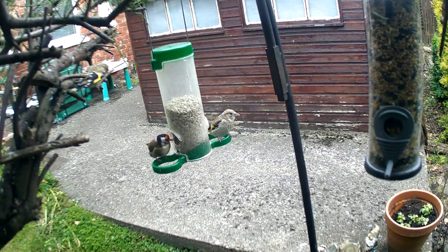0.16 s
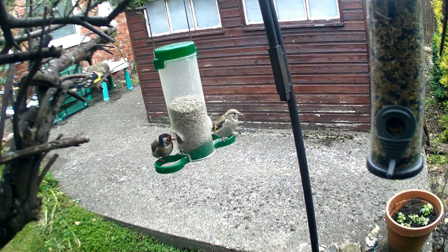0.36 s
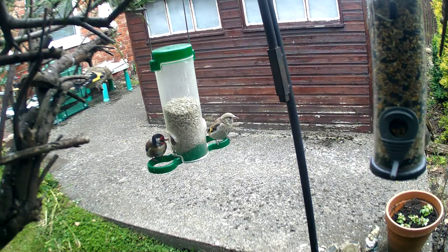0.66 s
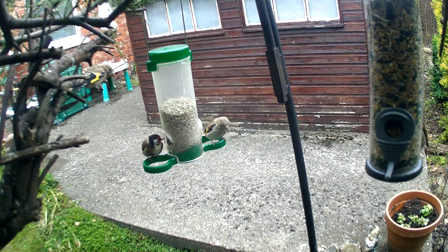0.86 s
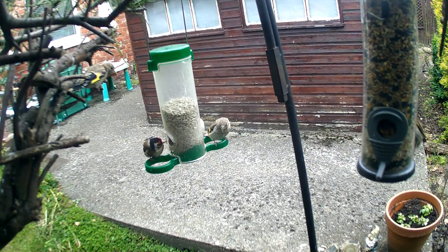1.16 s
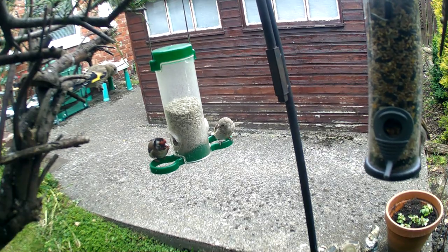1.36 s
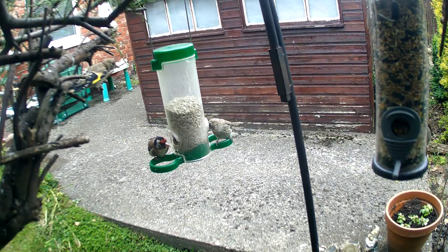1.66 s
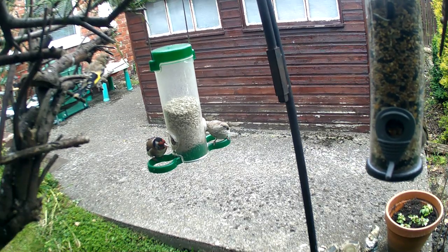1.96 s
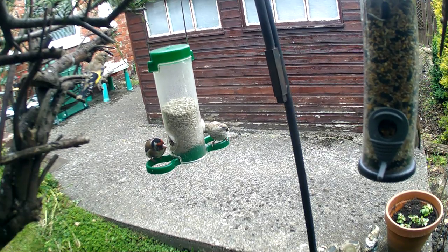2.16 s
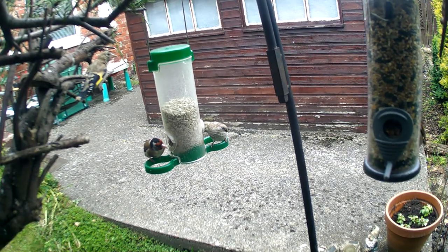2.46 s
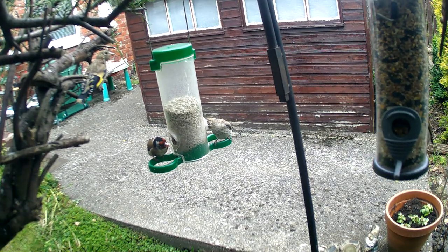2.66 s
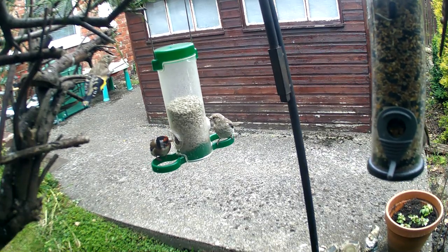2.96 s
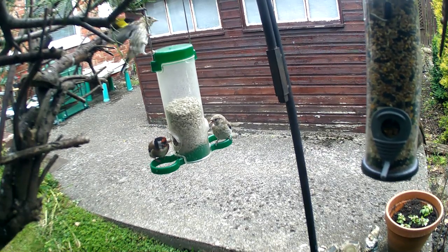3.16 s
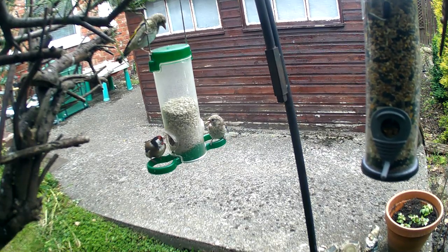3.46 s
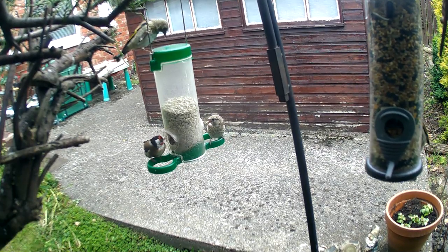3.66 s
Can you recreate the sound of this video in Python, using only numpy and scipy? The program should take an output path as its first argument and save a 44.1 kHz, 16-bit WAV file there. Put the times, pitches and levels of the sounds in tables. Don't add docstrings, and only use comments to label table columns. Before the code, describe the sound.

Garden birds whistle, chirp and twitter in overlapping bursts, with faint low rumble and hiss beneath.

```python
import sys
import numpy as np
from scipy import signal
from scipy.fft import rfft, irfft, next_fast_len
from scipy.io import wavfile
from scipy.ndimage import uniform_filter1d, map_coordinates

SR = 44100
rng = np.random.default_rng(int(sys.argv[2]) if len(sys.argv) > 2 else 0)


def convert_level_to_amplitude(level_db):
    exponent = np.asarray(level_db, float) / 20
    return 10 ** exponent


def put_to_file(sound):
    columns = np.atleast_2d(sound).T
    safe = np.clip(columns, -1, 1)
    whole_steps = np.round(safe * 32767)
    wavfile.write(sys.argv[1], SR, whole_steps.astype(np.int16))


N = 167580

# (frequency [Hz], density [dB per Hz])
RUMBLE_SPECTRUM = [(15, -67), (30, -19), (60, -13), (150, -4), (248, -5), (468, -7.5), (1100, -10.5),
                   (1430, -93)]
CHORUS_SPECTRUM = [(800, -100), (1100, -5), (3000, -2.5), (5400, -13), (7000, -28.5)]
HISS_SPECTRUM = [(3530, -62), (6500, -8.5), (8200, -5), (9800, -2.5), (11500, -5.5), (12300, -1),
                 (13000, -7), (15500, -10.5)]
# (frequency [Hz], correlation [-1..1])
STEREO_CORRELATION = [(30, 0.42), (120, 0.2), (300, -0.31), (600, 0.0028), (5000, 0.45), (14000, -0.24)]
# (time [s], level [dB])
DRONE_ENVELOPE = [(0, -67), (.8, -73), (.95, -53.5), (1.3, -67), (1.55, -56.5), (2, -68.5), (2.8, -58),
                  (3.3, -76), (3.8, -59.5)]
CHORUS_ENVELOPE = [(0.0, -56.5), (0.48, -52.5), (3.1, -51), (3.45, -57), (3.8, -52.5)]
# (delay [s], loss [dB], pan [dB])
WALL_SLAPS = [
    (0.029, -4.5, 4),
    (.058, -13, 2),
    (.085, -15.5, -6),
]

# (time [s], pitch [Hz], level [dB])
FIRST_GULL = [(0.044, 1110, -54.5), (0.073, 1252, -55.5), (0.099, 1600, -56), (0.449, 1405, -58)]
# (time [s], length [s], edge pitch [Hz], top pitch [Hz], level [dB], skew [exponent])
GULL_ARCHES = [
    (1.523, .225, 1135, 1353, -46.5, 0.69),
    (2.04, .22, 1182, 1338, -45.5, 0.71),
]
# (first [dB], second [dB], third [dB])
GULL_PARTIALS = [(-3.5, 0, -25), (-55, 0, -10), (-41, 0, -9)]
# (time [s], length [s], level [dB], first resonance [Hz])
CAWS = [
    (1.78, 0.38, -56.5, 1250),
    (2.577, 0.51, -52.5, 1303),
    (3.501, 0.47, -56, 1286),
]
# (ratio to first [1], level [dB])
CAW_UPPER = [(1.18, 1), (1.6, 3)]

# (time [s], length [s], centre pitch [Hz], level [dB])
FLURRIES = [(0.316, 0.18, 4093, -48), (0.518, .09, 2594, -47.5), (0.785, 0.11, 3240, -57),
            (1.397, 0.4, 3690, -61), (2.302, 0.12, 3500, -50), (3.197, 0.16, 3630, -67),
            (2.739, 0.26, 4200, -56)]

# (time [s], level [dB], start pitch [Hz])
TWITTERS = [
    (1.008, -56, 4600),
    (1.083, -53, 6300),
    (1.153, -52, 6400),
]
# (time [s], pitch [Hz])
TWITTER_CONTOUR = [(.014, 3050), (.024, 4350), (.034, 4900), (.048, 2600)]
# (time [s], start pitch [Hz], end pitch [Hz], level [dB])
FLICKS = [(.54, 2500, 4200, -50), (.527, 1700, 2400, -49), (.547, 2100, 3000, -48), (.556, 1900, 2800, -51),
          (.57, 2200, 3300, -48), (.582, 3300, 2800, -48), (.592, 1900, 2600, -45), (.598, 3200, 2700, -51),
          (.67, 2700, 5000, -49), (.677, 2400, 3400, -44), (.683, 3400, 2600, -45), (.699, 2200, 3500, -48),
          (.711, 2700, 3400, -49), (3.115, 4300, 2300, -50), (2.804, 6200, 6900, -53),
          (2.925, 6100, 6800, -54), (2.542, 5500, 7800, -54), (2.54, 11500, 8800, -57),
          (2.262, 6500, 7800, -58), (1.838, 2300, 2800, -53), (1.887, 2300, 2800, -51),
          (3.21, 3800, 4600, -46), (3.302, 4400, 2800, -53), (3.352, 3200, 4400, -57)]

# (time [s], level [dB], pitch factor [1])
CHIRPS = [
    (.35, -46.5, 0.96),
    (1.371, -44.5, 0.96),
    (2.276, -40, 1.01),
    (3.128, -41, .99),
]
# (time [s], pitch [Hz], relative level [dB])
CHIRP_CONTOUR = [(0, 3700, -9), (.01, 4400, 3), (.03, 4600, -0.5), (.042, 3600, -2.5), (.065, 3700, -7),
                 (.08, 3000, -10)]
# (frequency [Hz], level [dB])
RASP_SPECTRUM = [(2500, -48), (3100, -28.5), (4700, 1.5), (5500, -12.5), (11500, -21.5)]

# (time [s], length [s],
# start pitch [Hz], end pitch [Hz], level [dB])
SEEPS = [
    (2.272, 0.197, 7880, 6935, -39),
    (2.547, 0.185, 7910, 6986, -40.5),
    (3.025, 0.06, 5100, 4750, -45.5),
]
BURRS = [
    (2.807, .075, 5950, 5480, -45.5),
    (2.932, 0.057, 5930, 5450, -46.5),
    (2.999, .03, 5600, 5280, -50),
]
FAINT_TONES = [(3.635, .135, 5200, 3800, -57), (1.265, .15, 5200, 6200, -59), (.84, .075, 5600, 5100, -56),
               (.76, .06, 5950, 5850, -57), (1.318, .11, 7900, 7600, -63), (3.19, .08, 6400, 6700, -60),
               (3.065, .06, 6900, 7400, -62), (1.325, .04, 2300, 2800, -53), (1.985, .03, 4750, 4600, -57),
               (1.855, .03, 2800, 3100, -54), (1.755, .03, 3600, 3200, -52), (1.705, .035, 3500, 3900, -56),
               (2.07, .2, 1700, 1420, -54), (2.2, .06, 5500, 5000, -59), (2.955, .03, 3700, 3400, -49),
               (3.41, .02, 3100, 3500, -55), (3.435, .02, 3000, 3500, -55), (3.06, .04, 5900, 5400, -56),
               (1.01, .08, 7400, 7250, -61), (1.9, .2, 1300, 1120, -56), (1.92, .095, 2150, 2230, -49),
               (2.93, .14, 2050, 1550, -56), (.828, .03, 3200, 2950, -45)]
# (time [s], length [s], level [dB])
TRILL = [(3.127, 0.039, -43), (3.219, 0.067, -46), (3.322, 0.093, -48), (3.412, 0.0604, -48),
         (3.508, 0.068, -47.5)]
TRILL_PITCH = 4770, 4570

# (time [s], pitch [Hz], level [dB])
FLUTED = [
    [(0.975, 2293, -42), (1.041, 2427, -34), (1.21, 2136, -38)],
    [(1.322, 1980, -49), (1.358, 2078, -49.5), (1.366, 2132, -37), (1.388, 2174, -36), (1.41, 2130, -44)],
    [(1.737, 1894, -49.5), (1.82, 1860, -46), (1.85, 2083, -50), (1.86, 2206, -38), (1.88, 2167, -39),
     (1.905, 2220, -44)],
]
# (time [s], length [s], start pitch [Hz], end pitch [Hz], level [dB])
HELD = [
    (0.597, 0.1, 2183, 2084, -41.5),
    (0.75, 0.12, 1840, 1710, -45),
    (1.525, 0.15, 1895, 1876, -52),
    (2.113, 0.092, 2500, 2135, -39.5),
    (2.278, .21, 1957, 1780, -45.5),
    (2.378, 0.053, 2133, 2202, -37),
]
PIPS = [
    (0.251, 0.19, 1597, 2116, -50.5),
    (0.493, 0.099, 1617, 2170, -54),
    (2.001, 0.059, 1758, 2172, -48),
    (2.612, 0.0706, 2057, 2340, -40.5),
    (3.065, 0.064, 3384, 3910, -49.5),
]
# (time [s], length [s], edge pitch [Hz], top pitch [Hz], level [dB])
THRUSH_ARCH = (.7, .205, 2250, 3960, -47)
# (time [s], pitch [Hz], level [dB])
PURR = [(0.18, 2690, -55.5), (0.26, 2410, -45.5), (0.53, 2196, -46.5)]
# (time [s], length [s], centre pitch [Hz], level [dB])
WARBLE = (2.755, .235, 3230, -53)


def unit(x):
    return x / np.sqrt(np.mean(x ** 2) + 1e-20)


def along(points, hz):
    f, db = np.transpose(points)
    return np.interp(np.log(hz + 1), np.log(f), db, left=-120, right=-120)


def wobble(n, rate_hz):
    knots = rng.standard_normal(int(n / SR * 1000) + 9)
    return map_coordinates(knots, [np.arange(n) * rate_hz / SR])


def filtered(x, response):
    m = next_fast_len(x.shape[-1] + 8192)
    spectrum = rfft(x, m) * response(np.fft.rfftfreq(m, 1 / SR))
    return irfft(spectrum, m)[..., :x.shape[-1]]


def add(out, s, x, pan_db, wet_db):
    t60_s, onset_s = 0.71, 0.0026
    t = np.arange(SR // 2) / SR
    tail = rng.standard_normal((2, len(t))) * convert_level_to_amplitude(-60 * t / t60_s) * np.clip(t / onset_s, 0, 1)
    both = signal.fftconvolve(x[None], convert_level_to_amplitude(wet_db) * tail / np.linalg.norm(tail[0]), axes=1)
    both[:, :len(x)] += x * convert_level_to_amplitude([[pan_db / 2], [-pan_db / 2]])
    part = out[:, round(s * SR):]
    part[:, :both.shape[1]] += both[:, :part.shape[1]]


def whistle(rows, partials_db, waver, flutter_db, edge_s):
    s, hz, db = np.transpose(rows)
    t = np.arange(s[0], s[-1], 1 / SR)
    pitch_hz = np.interp(t, s, hz) * (1 + waver * wobble(len(t), 396.9))
    phase = 2 * np.pi * np.cumsum(pitch_hz) / SR
    edge = np.clip(np.minimum(t - s[0], s[-1] - t) / edge_s, 0, 1)
    tone = sum(convert_level_to_amplitude(d) * np.sin((k + 1) * phase) for k, d in enumerate(partials_db))
    level_db = np.interp(t, s, db) + flutter_db * wobble(len(t), 87.4)
    return np.sqrt(2) * tone * edge * convert_level_to_amplitude(level_db)


def glide(s, length_s, from_hz, to_hz, db, bend=1):
    u = np.linspace(0, 1, num=12)
    return np.transpose([s + u * length_s, to_hz + (from_hz - to_hz) * (1 - u) ** bend, db + 0 * u])


def arch(s, length_s, edge_hz, top_hz, db, skew):
    u = np.linspace(0, 1, num=24)
    hz = edge_hz + (top_hz - edge_hz) * np.sin(np.pi * u ** skew)
    return np.transpose([s + u * length_s, hz, np.full_like(u, db)])


def rush(spectrum, patchy_db):
    z = signal.stft(rng.standard_normal((2, N)), nperseg=512)[2]
    field = uniform_filter1d(rng.standard_normal(z.shape[1:]), size=5, axis=0)
    field = uniform_filter1d(field, size=12, axis=1)
    pair = signal.istft(z * convert_level_to_amplitude(patchy_db * unit(field)), nperseg=512)[1][:, :N]

    def mid_side(hz):
        correlation = np.interp(hz, *np.transpose(STEREO_CORRELATION))
        angle = np.arccos(np.clip(correlation, -1, 1)) / 2
        return convert_level_to_amplitude(along(spectrum, hz)) * [np.cos(angle), np.sin(angle)]

    mid, side = filtered(pair, mid_side)
    return unit(np.array([mid + side, mid - side]))


def background():
    town_db, chorus_db, hiss_db, drone_hz = -56, -4.0, -61.5, 205.8
    t = np.arange(N) / SR
    drone_gain = convert_level_to_amplitude(np.interp(t, *np.transpose(DRONE_ENVELOPE)))
    chorus_gain = convert_level_to_amplitude(np.interp(t, *np.transpose(CHORUS_ENVELOPE)))
    drone = np.sin(2 * np.pi * np.cumsum(drone_hz + 12 * wobble(N, 25)) / SR)
    drone = drone * drone_gain * convert_level_to_amplitude(-2.0 + 2.97 * wobble(N, 14))
    town = (convert_level_to_amplitude(town_db) * rush(RUMBLE_SPECTRUM, 1.55) + drone) * convert_level_to_amplitude([[-1.2], [1.2]])
    chorus = chorus_gain * convert_level_to_amplitude(chorus_db) * rush(CHORUS_SPECTRUM, 3.9)
    return town + chorus + convert_level_to_amplitude(hiss_db) * rush(HISS_SPECTRUM, 3.7)


def gulls(out):
    cries = [FIRST_GULL] + [arch(*row) for row in GULL_ARCHES]
    for rows, partials_db in zip(cries, GULL_PARTIALS):
        add(out, rows[0][0], whistle(rows, partials_db, 0.0095, 2.7, 0.0025), -.8, -6.5)


def crow(out):
    pulse_hz, width_hz = 275.4, 150
    for s, length_s, db, first_hz in CAWS:
        t = np.arange(0, length_s, 1 / SR)
        rate_hz = pulse_hz * (1 - .12 * t / length_s + 0.044 * wobble(len(t), 150))
        cycles = np.cumsum(rate_hz) / SR
        source = np.exp(-8 * (cycles % 1)) * (1 + 1.17 * rng.standard_normal(len(t)))

        def throat(f):
            resonances = [(0.99, 0)] + CAW_UPPER
            return sum(convert_level_to_amplitude(d) * np.exp(-((f - r * first_hz) / width_hz) ** 2) for r, d in resonances)

        swell = np.sin(np.pi * (t / length_s) ** 0.59) * convert_level_to_amplitude(db + 2.8 * wobble(len(t), 25.2))
        add(out, s, unit(filtered(source, throat)) * swell, 1.5, -2.5)


def flock(out, count=16):
    for s, length_s, hz, db in FLURRIES:
        for when, high, slide, size, long in rng.random((count, 5)):
            mid_hz = hz * (1.05 - .12 * when) * 2 ** (.45 * (high - .5))
            from_hz, to_hz = mid_hz * (1.2 - .35 * slide), mid_hz * (.85 + .35 * slide)
            rows = glide(0, .008 + .022 * long, from_hz, to_hz, db - 9 * size)
            add(out, s + when * length_s, whistle(rows, [0], .035, 2.5, .0015), 7 * (slide - .5), -1.5)


def finches(out):
    for s, db, start_hz in TWITTERS:
        rows = [(0.0063, start_hz, db)] + [(t, hz, db) for t, hz in TWITTER_CONTOUR]
        add(out, s, whistle(rows, [0], 0.0045, 2.2, 0.001), -.8, -7.5)
    for s, *row in FLICKS:
        add(out, s, whistle(glide(s, .009, *row), [0], .012, 1.5, .001), .8, -3)


def sparrows(out):
    rasp_db, rasp_lead_s, rasp_s = -7, 0.024, 0.15
    t = np.arange(0, rasp_s, 1 / SR)
    for s, db, pitch in CHIRPS:
        for delay_s, loss_db, pan_db in [(0, 0, 1.0)] + WALL_SLAPS:
            rows = [(u, hz * pitch, db + d + loss_db) for u, hz, d in CHIRP_CONTOUR]
            add(out, s + delay_s, whistle(rows, [0, -26], 0.0306, 3, 0.001), pan_db, -3)
        noise = rng.standard_normal(len(t))
        rasp = unit(filtered(noise, lambda f: convert_level_to_amplitude(along(RASP_SPECTRUM, f / pitch))))
        swell = np.sin(np.pi * np.sqrt(t / rasp_s)) * convert_level_to_amplitude(db + rasp_db + 1.7 * wobble(len(t), 52))
        add(out, s - rasp_lead_s, rasp * swell, .8, -1.5)


def robin(out):
    for row in SEEPS:
        add(out, row[0], whistle(glide(*row, 3.8), [0], .005, 1.8, .002), -2.5, -8)
    for row in BURRS:
        add(out, row[0], whistle(glide(*row, 1.58), [0, -22], 0.0263, 3.3, 0.0031), -2.4, -2.5)
    for s, length_s, db in TRILL:
        rows = glide(s, length_s, *TRILL_PITCH, db)
        add(out, s, whistle(rows, [0], 0.0083, 2.6, 0.0085), 2.5, -6.5)
    for row in FAINT_TONES:
        add(out, row[0], whistle(glide(*row), [0], 0.022, 0.88, 0.01), .8, -1.5)


def thrush_purr(out):
    purr_hz, purr_from_s = 58.04, 0.18
    tone = whistle(PURR, [2.5], 0.016, 0.52, 0.0067)
    t = np.arange(len(tone)) / SR + PURR[0][0] - purr_from_s
    pulsation = np.where(t > 0, np.cos(np.pi * purr_hz * t) ** 2, .7)
    add(out, PURR[0][0], tone * pulsation, 3.5, -7.5)


def thrush_warble(out):
    swing_hz, swing_s = 250, .088
    s, length_s, hz, db = WARBLE
    t = np.linspace(0, length_s, num=40)
    pitch_hz = hz + swing_hz * np.cos(2 * np.pi * (t - .033) / swing_s)
    rows = np.transpose([t, pitch_hz, db + 8 * t])
    add(out, s, whistle(rows, [0, -24, -20], 0.038, 1.2, 0.0078), 2.5, 1.5)


def thrush(out):
    held = [glide(*row, 2.5 if row[1] > .2 else 1) for row in HELD]
    for rows in list(FLUTED) + held:
        add(out, rows[0][0], whistle(rows, [0], 0.014, 2.0, 0.0085), -3.5, -7.5)
    for delay_s, loss_db in [(0, 0), WALL_SLAPS[-1][:2]]:
        note = whistle(arch(*THRUSH_ARCH, .68), [0], 0.0273, 1.8, 0.0055)
        add(out, THRUSH_ARCH[0] + delay_s, convert_level_to_amplitude(loss_db) * note, .6, -3)
    thrush_purr(out)
    for row in PIPS:
        add(out, row[0], whistle(glide(*row), [0], 0.04, 3.0, 0.0072), -1.2, -3.5)
    thrush_warble(out)


def scene():
    out = background()
    for bird in (gulls, crow, flock, finches, sparrows, robin, thrush):
        bird(out)
    return out


def band_limit(x):
    return signal.sosfilt(signal.butter(12, 15650, fs=SR, output="sos"), x)


def record(dry):
    lag_s = 3e-5
    side = np.array([[1], [-1]])
    wet = filtered(dry, lambda hz: np.exp(1j * np.pi * hz * lag_s * side))
    return band_limit(wet)


dry = scene()
out = record(dry)
put_to_file(out)
```